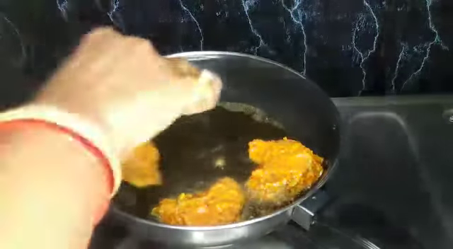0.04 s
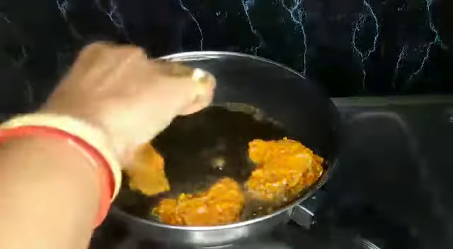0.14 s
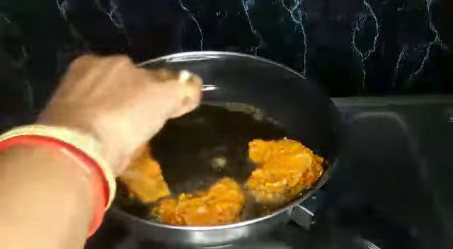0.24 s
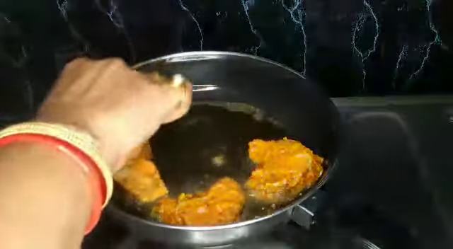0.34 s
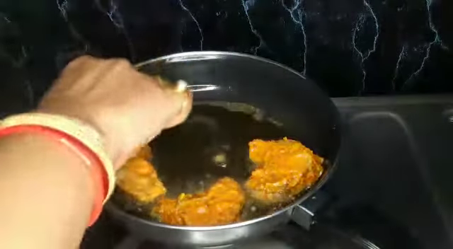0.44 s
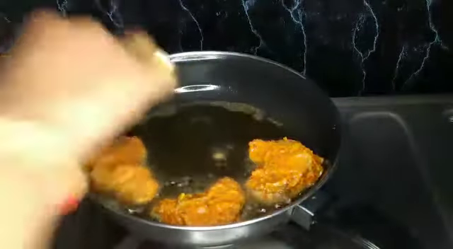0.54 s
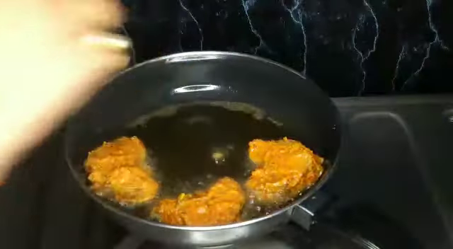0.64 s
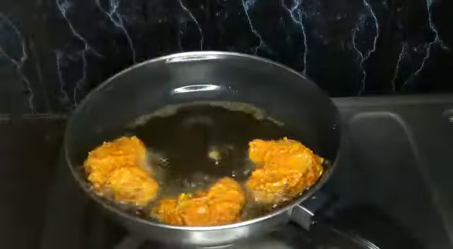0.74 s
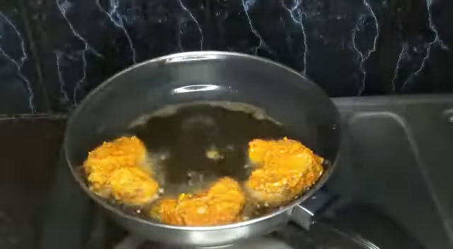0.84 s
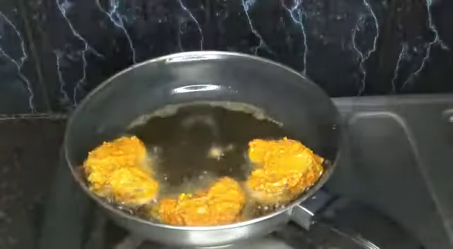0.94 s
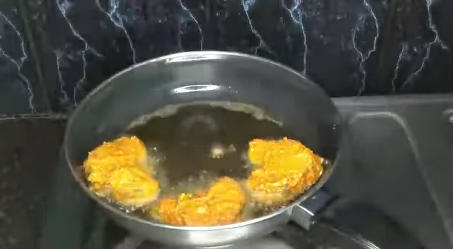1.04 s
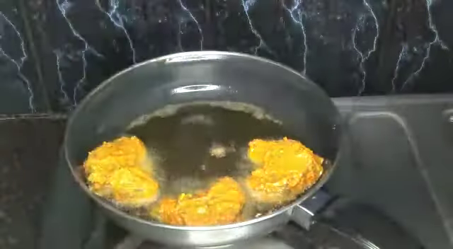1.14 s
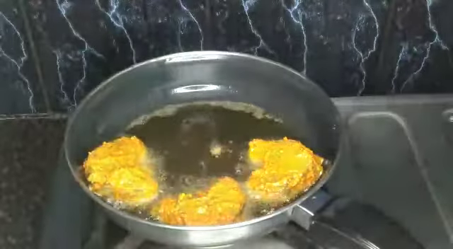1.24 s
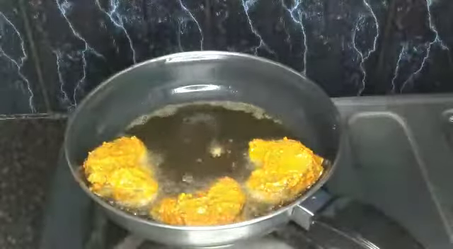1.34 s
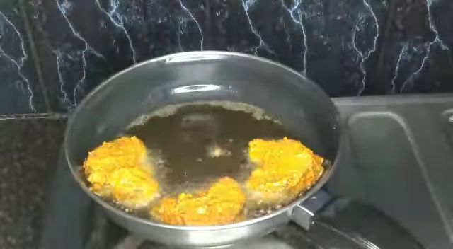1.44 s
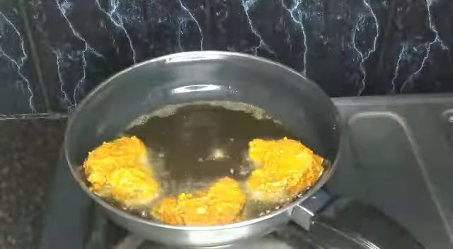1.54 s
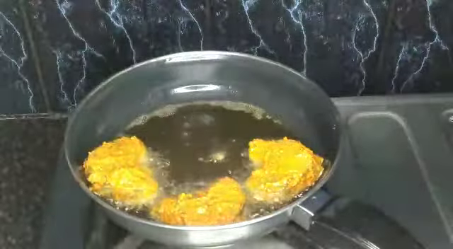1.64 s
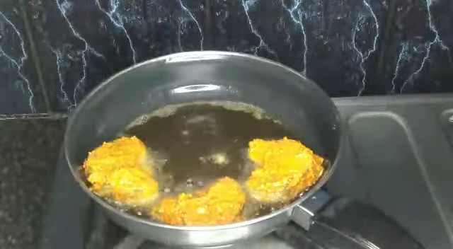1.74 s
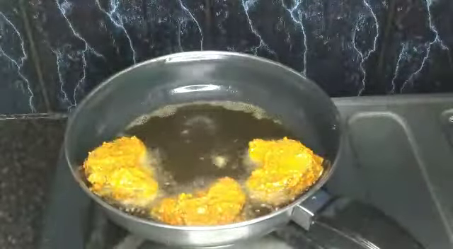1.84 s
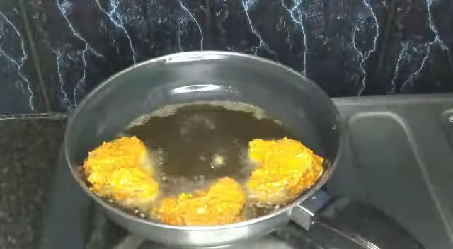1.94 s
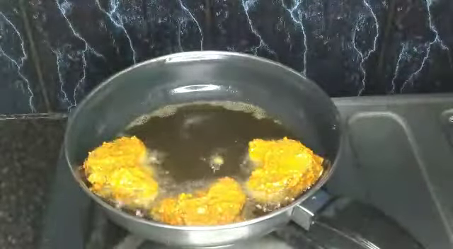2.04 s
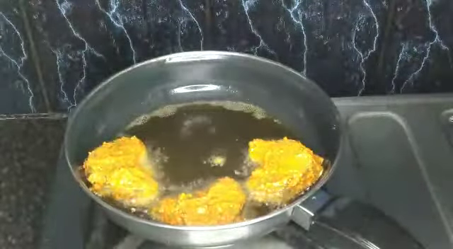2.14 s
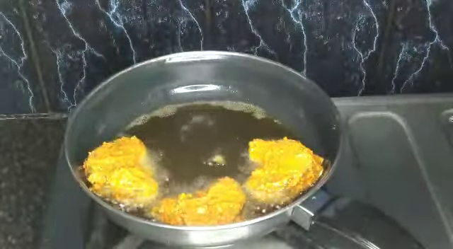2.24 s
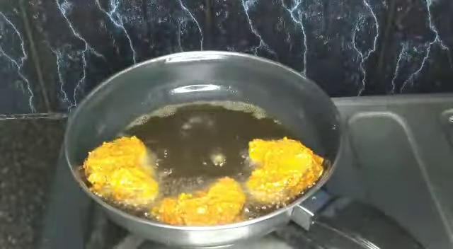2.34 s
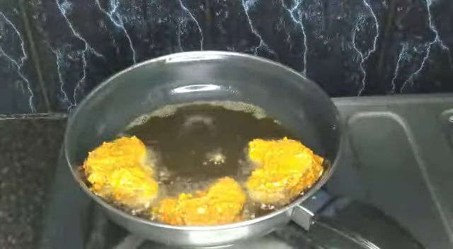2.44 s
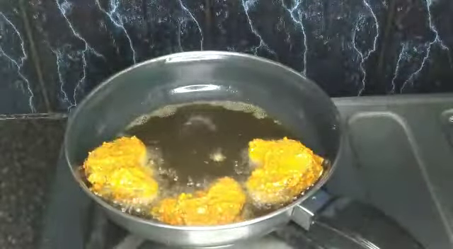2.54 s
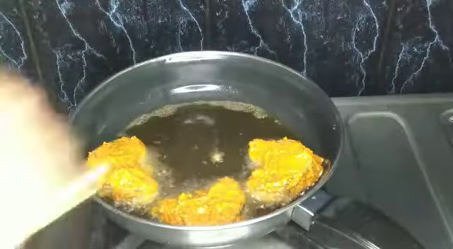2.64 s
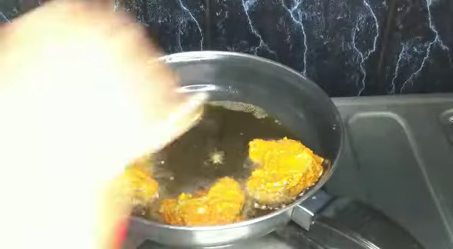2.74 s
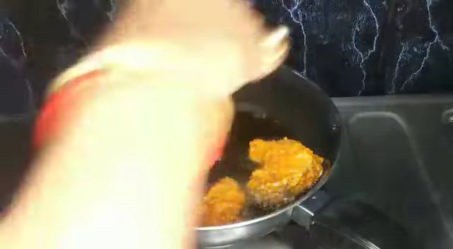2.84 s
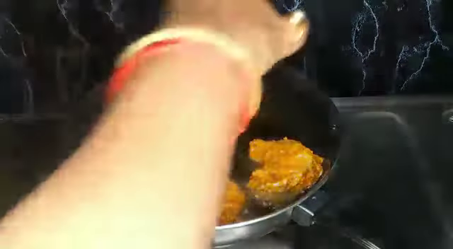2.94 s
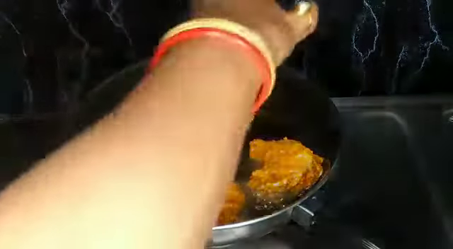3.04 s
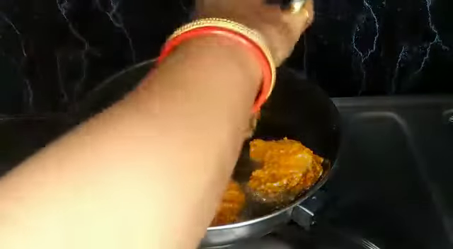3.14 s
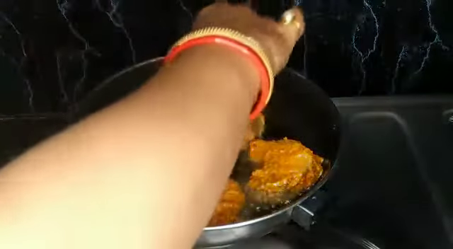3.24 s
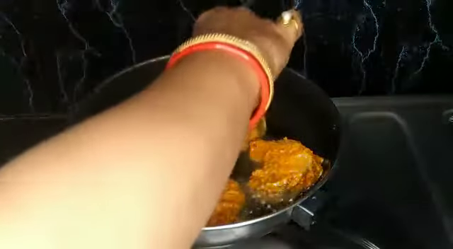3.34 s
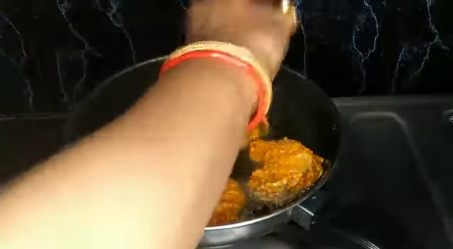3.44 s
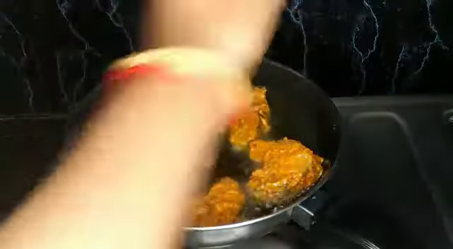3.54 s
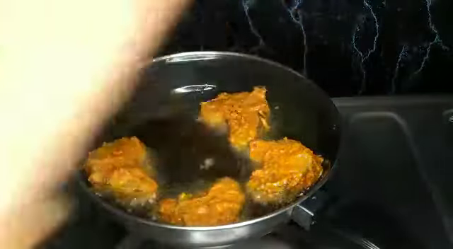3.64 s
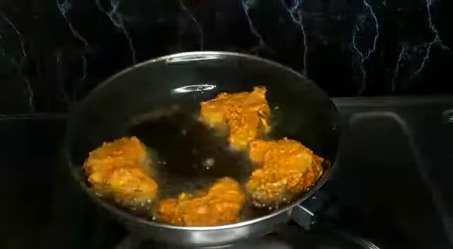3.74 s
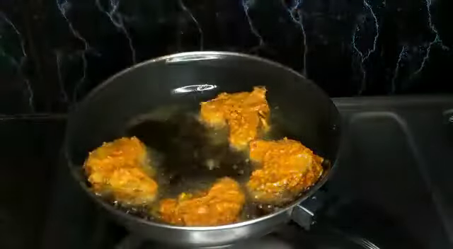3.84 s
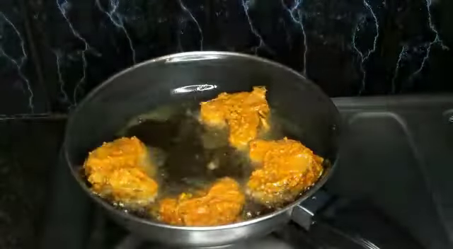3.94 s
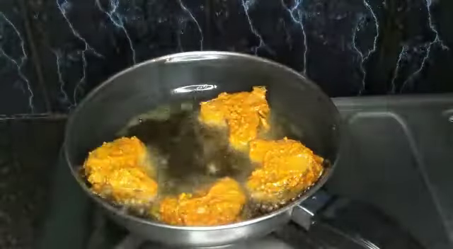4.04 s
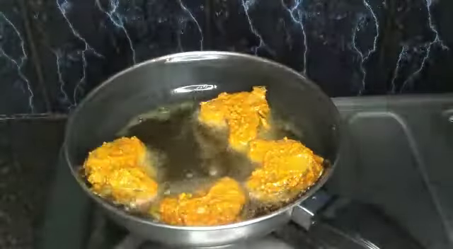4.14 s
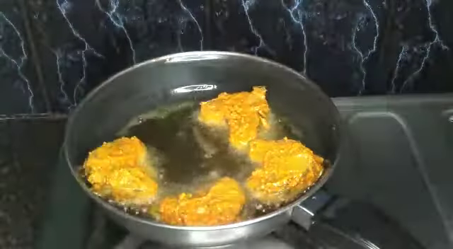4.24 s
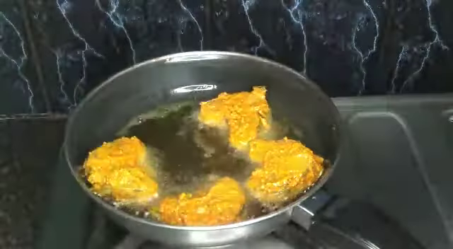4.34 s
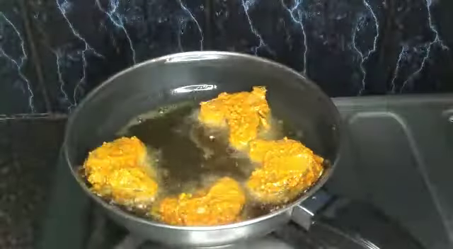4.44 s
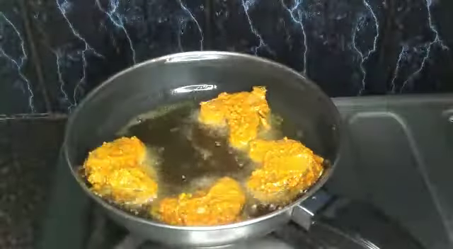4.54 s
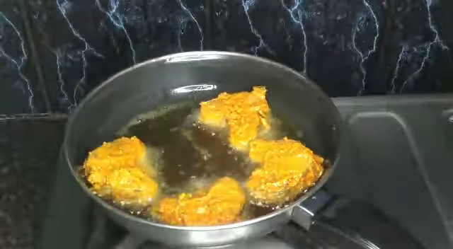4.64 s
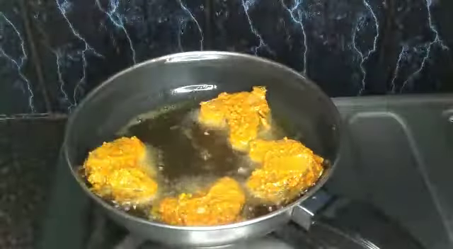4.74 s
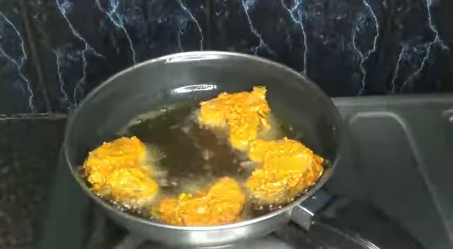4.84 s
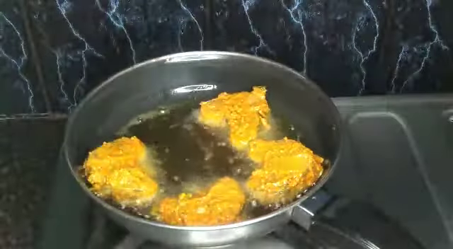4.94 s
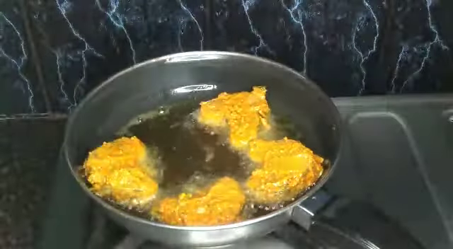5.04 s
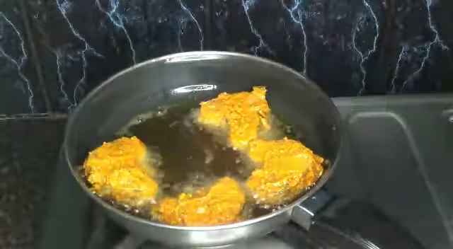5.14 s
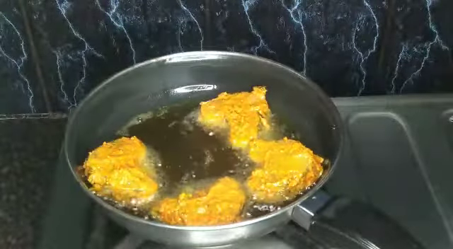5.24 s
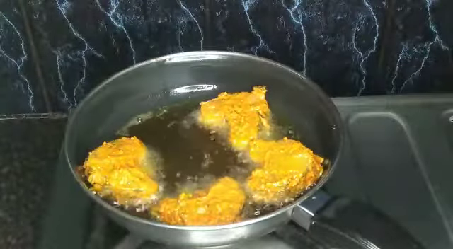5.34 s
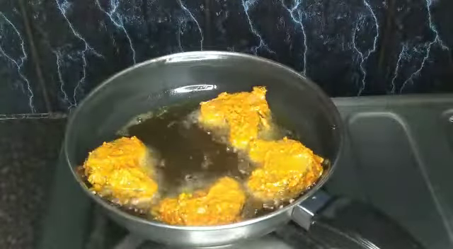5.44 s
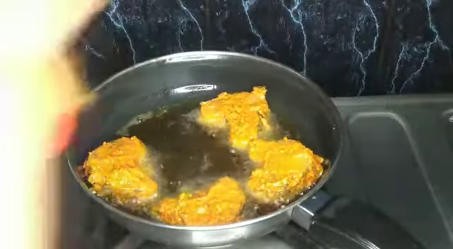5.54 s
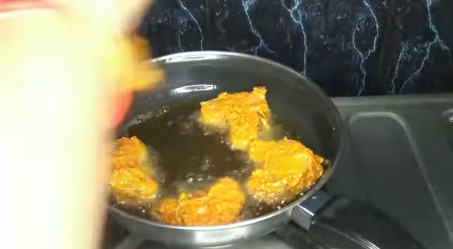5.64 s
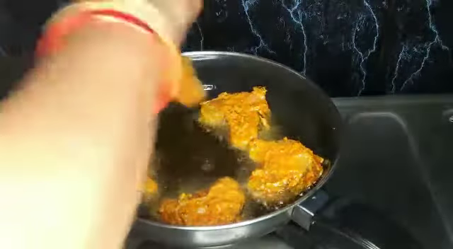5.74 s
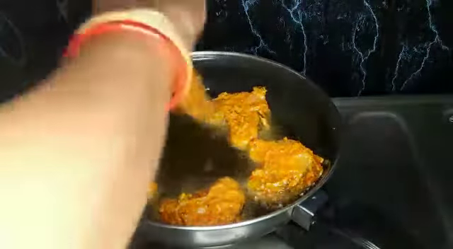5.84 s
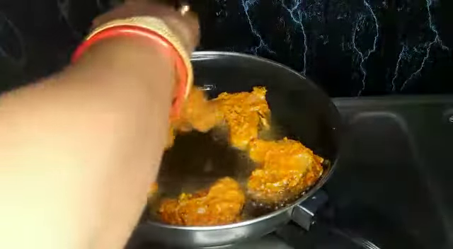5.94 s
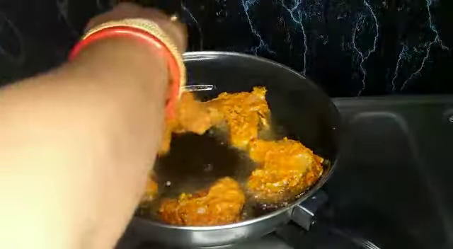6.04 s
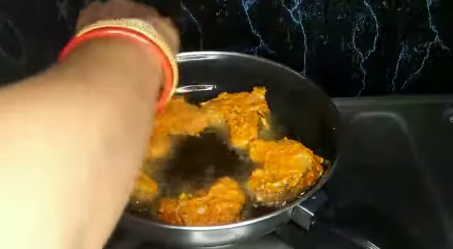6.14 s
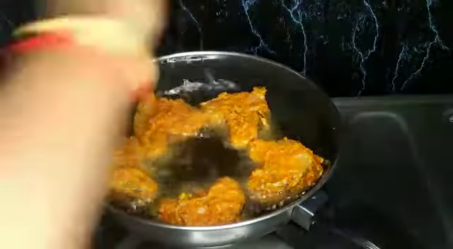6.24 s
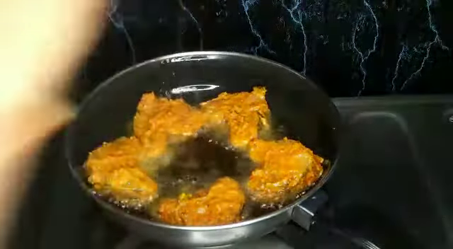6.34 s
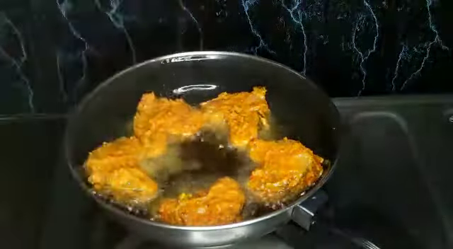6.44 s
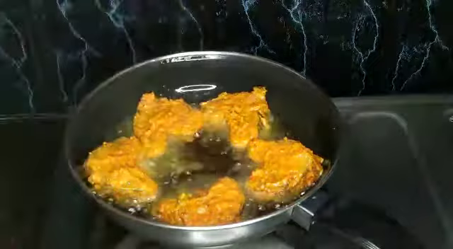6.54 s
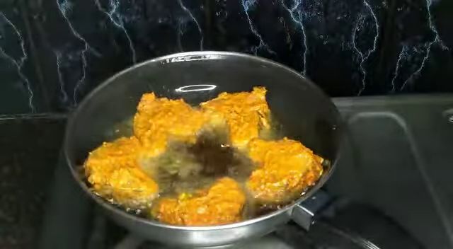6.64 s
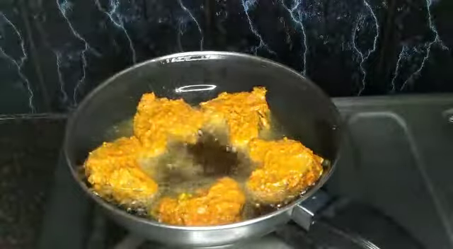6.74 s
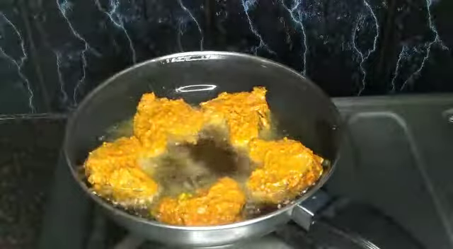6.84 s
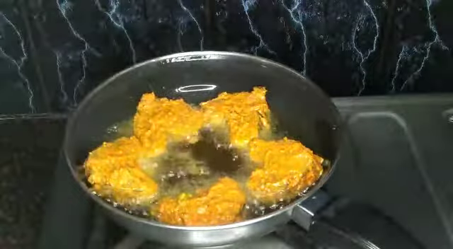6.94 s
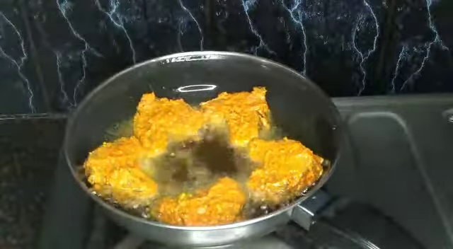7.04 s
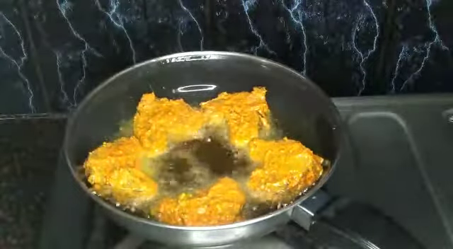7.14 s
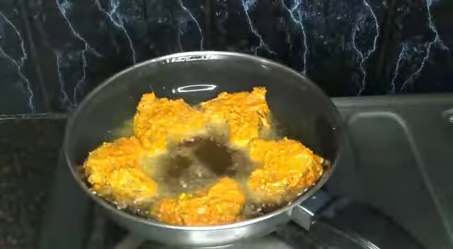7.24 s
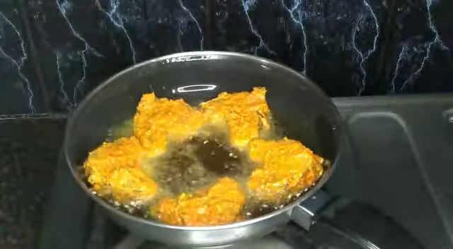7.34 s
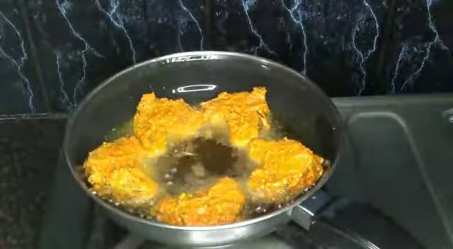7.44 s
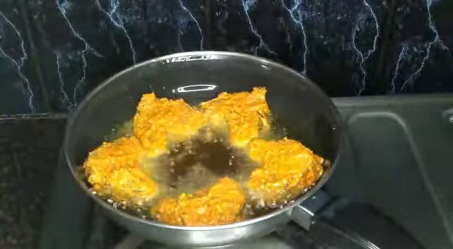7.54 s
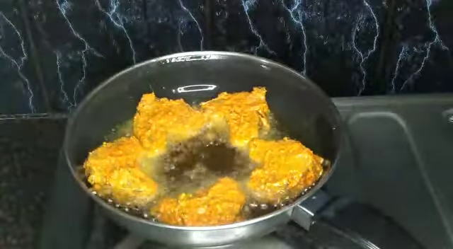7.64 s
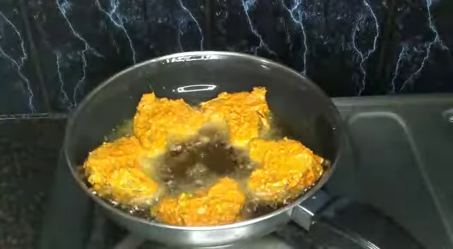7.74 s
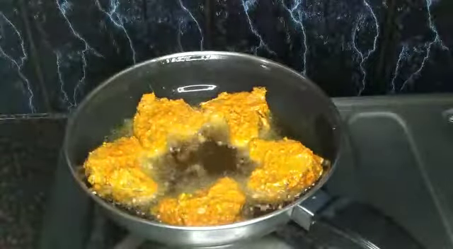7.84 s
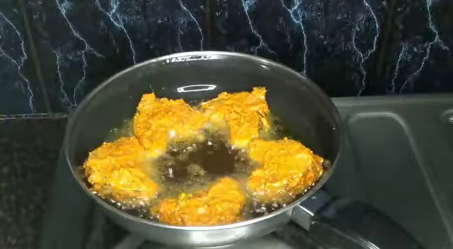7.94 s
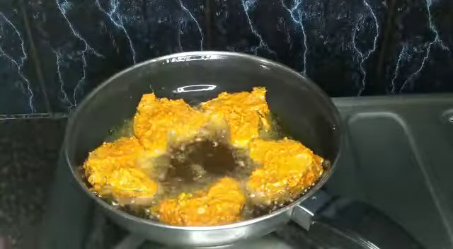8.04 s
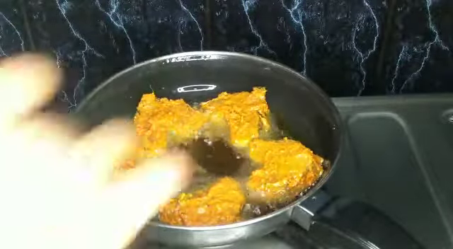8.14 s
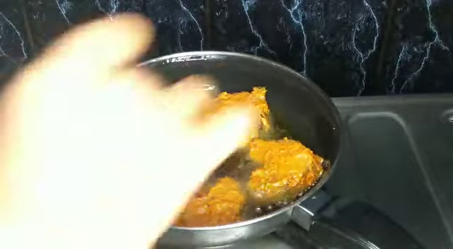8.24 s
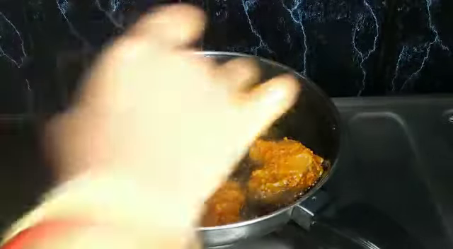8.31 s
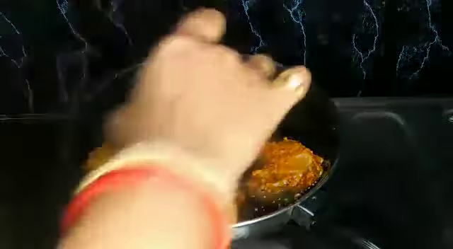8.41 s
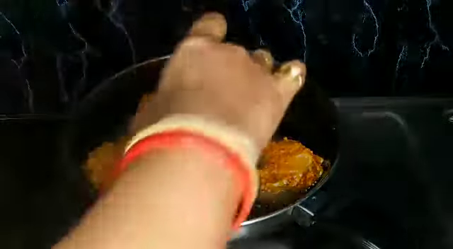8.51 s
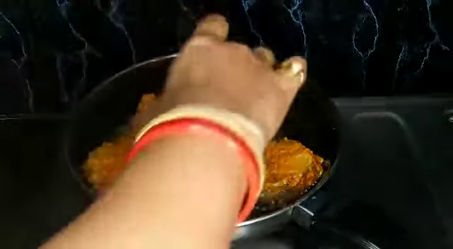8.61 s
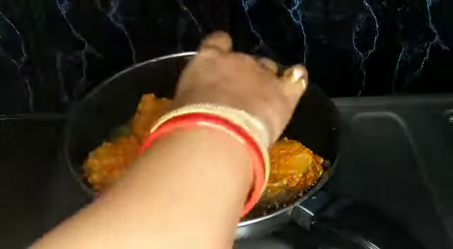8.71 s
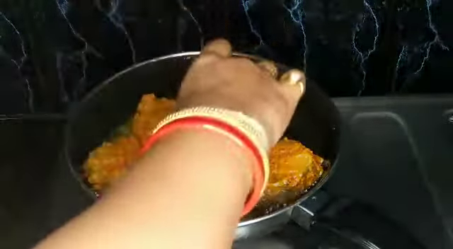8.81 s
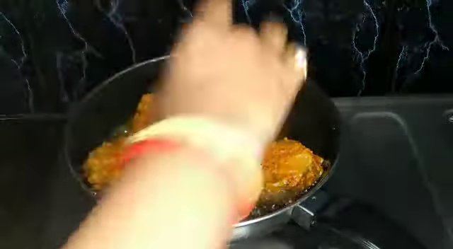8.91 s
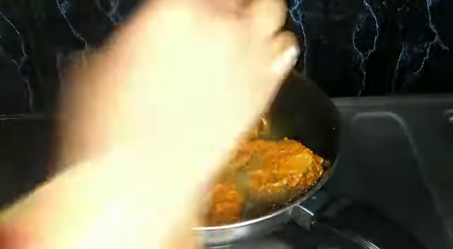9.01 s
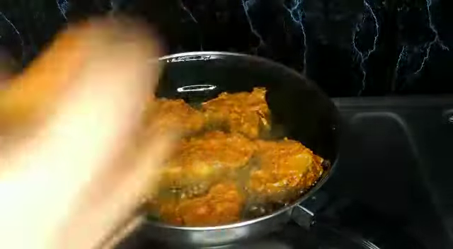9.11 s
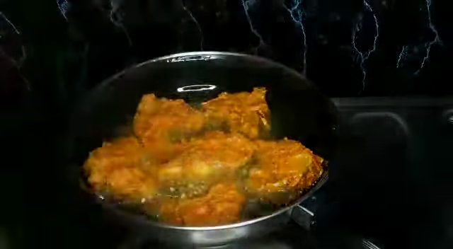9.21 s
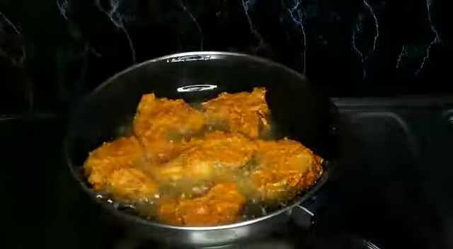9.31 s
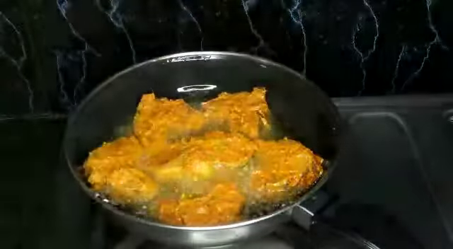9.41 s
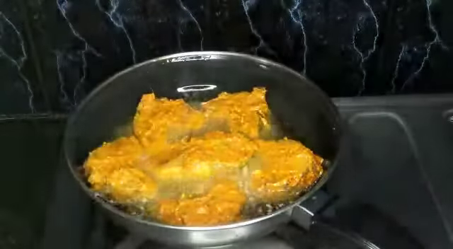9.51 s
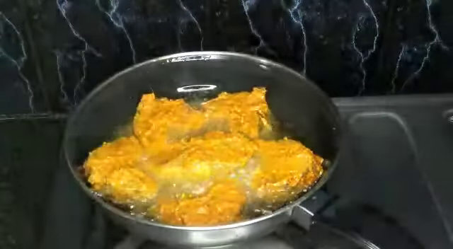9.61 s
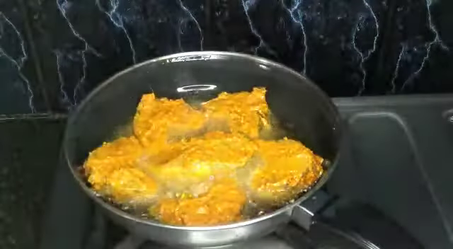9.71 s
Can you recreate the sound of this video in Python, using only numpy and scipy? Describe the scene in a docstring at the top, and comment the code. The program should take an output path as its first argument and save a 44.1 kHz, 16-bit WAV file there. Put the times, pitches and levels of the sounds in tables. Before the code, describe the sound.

Thin, high frying hiss with tiny sharp pops and occasional wet bubble bursts ringing slightly in the pan. It begins gently, stays sparse for three seconds, then surges hard twice as wet pieces meet the oil, each time settling back to light crackling. A softer, shorter surge with faint dull bumps comes near the end. Close phone microphone, bright sound, little bass, quiet kitchen background.

```python
"""Coated fish fries in a steel pan close to a phone: a brief swell of fizz opens over a quiet simmer.
The sizzle surges as wet pieces meet the oil, near 3.6 s and again near 6.3 s, and swells less near 9.3 s.
Throughout, noise and tiny damped rings make the fizz and simmer, brightest near 9 kHz; water drops spit
as short rings with spray, and large bubbles plop as longer rings with a gurgling tail and a splash.
Behind them lie filtered-noise room tone, a wavering two-tone hum and soft decaying bumps."""
import sys
import numpy as np
from scipy import signal
from scipy.fft import rfft, irfft, next_fast_len
from scipy.io import wavfile
from scipy.ndimage import uniform_filter1d, map_coordinates

SR = 44100
rng = np.random.default_rng(int(sys.argv[2]) if len(sys.argv) > 2 else 0)


def dump(signal):
    """Clip the signal to [-1, 1] and save it as 16-bit WAV at the path in sys.argv[1]."""
    limited = np.clip(np.atleast_2d(signal).T, -1, 1)
    pcm = np.round(limited * 32767).astype(np.int16)
    wavfile.write(sys.argv[1], SR, pcm)


N = 430857  # samples

# Level rides of the frying, before trims: start_s [s], fizz_db, seethe_db, simmer_db [dB]
FRYING_LEVELS = [(0, -49, -62.5, -56.5), (.17, -42.5, -48.5, -50.5), (.45, -38.5, -52.5, -52),
                 (.72, -40, -50.5, -53.5), (.98, -47.5, -57.5, -58), (1.2, -44, -57, -53),
                 (2.05, -47.5, -58, -57.5), (2.7, -43, -57.5, -60), (3.15, -50, -65, -62),
                 (3.4, -40.5, -59, -48.5), (3.6, -26, -38, -49.5), (3.75, -25, -39.5, -47),
                 (4.02, -25.5, -43.5, -49.5), (4.3, -31, -49.5, -53), (4.5, -34.5, -51, -57),
                 (4.6, -43.5, -54, -53.5), (4.87, -45.5, -62.5, -59.5), (5.9, -49, -57, -60),
                 (6.12, -39, -62.5, -59), (6.3, -26, -42, -49.5), (6.75, -29, -46.5, -46.5),
                 (7.0, -35.5, -57.5, -52.5), (7.2, -33.5, -64, -54), (7.5, -45.5, -69.5, -59),
                 (7.8, -52.5, -58, -55.5), (8.2, -45, -61.5, -56), (8.52, -52.5, -64, -61.5),
                 (8.65, -54.5, -57, -52), (8.85, -45, -54.5, -49.5), (9.28, -35, -43, -47),
                 (9.58, -37.5, -53.5, -50), (9.77, -41.5, -71, -55.5)]
# Level rides of the middle sizes, before trims: start_s [s], spatter_db, upper_simmer_db [dB]
MIDDLE_LEVELS = [(0, -79, -75), (.2, -65, -56), (.95, -63.5, -61), (2.0, -75, -61.5), (2.6, -67, -66),
                 (3.15, -68, -64.5), (3.45, -54.5, -52.5), (3.7, -41.5, -44), (4.05, -45, -49.5),
                 (4.55, -65, -57), (5.9, -72, -66.5), (6.3, -44, -48.5), (6.75, -54.5, -54.5),
                 (7.2, -61.5, -56.5), (7.8, -71, -64.5), (8.55, -69.5, -64), (9.3, -51, -56.5),
                 (9.77, -62, -58.5)]
# Colours of the bubble sizes, fine to coarse: freq_hz [Hz], gain_db [dB]
FIZZ_COLOUR = [(3240, -39), (5500, -15), (7570, -3), (8880, 3.5), (9940, 2), (11000, -5), (14300, -15.5),
               (14800, -36), (15000, -87)]
SPATTER_COLOUR = [(2600, -45), (3400, -5), (4600, -3.5), (5300, -1), (6000, 2), (7500, -32.5)]
SEETHE_COLOUR = [(1700, -71), (2300, -4.5), (2600, 1), (3300, -6), (4300, -17)]
UPPER_SIMMER_COLOUR = [(1100, -47), (1450, -3.5), (1800, 1), (2200, 0.5), (2800, -31)]
SIMMER_COLOUR = [(380, -52), (650, -7.5), (800, -0.5), (1300, 0), (1550, 1), (1900, -40)]


def frying():
    """Bubbles of several sizes, from fine fizz to a low simmer that rings in the pan's hollow."""
    fizz_db, seethe_db, simmer_db = curves(FRYING_LEVELS)
    spatter_db, upper_db = curves(MIDDLE_LEVELS)
    # the harder the frying, the more the bubbles even out
    uneven = np.interp(fizz_db, [-46, -33], [1, .35])
    # bubbles come in flurries that stir all sizes
    flurry_db = 2.0 * uneven * wobble(25)

    fizz_gain = amp(fizz_db - 1.0 + flurry_db + 1.3 * wobble(90))
    fizz = fizz_gain * bed(FIZZ_COLOUR, patchy_db=1.5, count=24000, spread_db=4.5, share=0.25, life_s=0.005)

    spatter_gain = amp(spatter_db + 3.5 + flurry_db + 2.5 * uneven * wobble(35))
    spatter = spatter_gain * bed(SPATTER_COLOUR, patchy_db=4.5, count=1100, spread_db=3.5,
                                 share=.25, life_s=0.016)

    seethe_gain = amp(seethe_db - 4.0 + 0.5 * flurry_db + 1.6 * uneven * wobble(30))
    seethe = seethe_gain * bed(SEETHE_COLOUR, patchy_db=2.5, count=2400, spread_db=2.5,
                               share=0.18, life_s=0.012)

    simmer = bed(SIMMER_COLOUR, patchy_db=1.5, count=900, spread_db=-4.5, share=0.25, life_s=0.051)
    upper = bed(UPPER_SIMMER_COLOUR, patchy_db=2.5, count=900, spread_db=4.5, share=0.23, life_s=0.014)
    low = amp(simmer_db - 6.0) * unit(hollow(simmer)) + amp(upper_db - 1.5) * unit(hollow(upper))
    low_swing = amp(0.093 * flurry_db + 0.79 * uneven * wobble(15))
    return fizz + spatter + seethe + low_swing * low


# Water drops spitting: start_s [s], level_db [dB, before trim], pitch_hz [Hz],
# sputter_db [dB of spray against level_db]
SPIT_EVENTS = [(0.2423, -30, 9210, -15), (0.2678, -38, 8990, -15), (0.3247, -22.5, 9900, -15),
               (0.3704, -29, 9360, -21), (0.4284, -33, 9200, -22), (0.5043, -29.5, 8150, -4),
               (0.615, -28.5, 10100, -9.5), (0.8124, -24, 8160, -16), (0.8194, -25, 8100, -18),
               (0.8304, -30, 9160, -18), (1.0256, -43, 8750, -6), (1.049, -27.5, 8750, -7.5),
               (1.0807, -21.5, 9070, -9), (1.0934, -29, 9100, -18), (1.1626, -20, 9200, -14.5),
               (1.213, -27.5, 9100, -8), (1.3455, -27.5, 9850, -20), (1.5415, -21, 9700, -12),
               (1.6445, -27, 8940, -23), (1.6722, -22.5, 9440, -11.5), (1.8098, -18.5, 7850, -22),
               (1.8595, -22.5, 9100, -14.5), (2.0322, -25, 9750, -12), (2.243, -21, 8900, -23),
               (2.261, -29, 9540, -20), (2.2902, -28, 8500, -15), (2.3241, -28, 7700, -13),
               (2.419, -27.5, 9200, -6), (2.511, -20.5, 8540, -18), (2.6257, -22, 9130, -13),
               (2.809, -26, 8800, -18), (2.863, -24.5, 9060, -11.5), (2.957, -24, 10000, -18),
               (2.978, -31.5, 9650, -5), (3.2615, -33, 10300, -18), (3.2824, -35, 9100, -6),
               (3.32, -25.5, 8880, -8.5), (3.48, -25, 9870, -15), (3.5584, -22, 9750, -8),
               (3.677, -14, 9100, -9), (3.9374, -18, 9720, -15), (4.0098, -10.5, 8200, -25),
               (4.0477, -15, 9150, -17), (4.3938, -10, 9100, -17.5), (4.4064, -25, 9430, -24),
               (4.435, -16, 7950, -16), (4.6733, -27.5, 9250, -10.5), (4.7133, -30, 9050, -7),
               (4.8289, -37, 9200, -31), (4.8552, -21, 10100, -10.5), (5.0404, -28, 10900, -13),
               (5.1078, -19.5, 9000, -15.5), (5.2126, -33, 11300, -24), (5.242, -24.5, 10660, -22),
               (5.3534, -22, 9650, -14.5), (5.438, -23, 8900, -12), (5.5348, -29, 8800, -8),
               (5.654, -27.5, 8800, -23), (5.7348, -28, 9500, -17), (5.8345, -31, 9700, -9),
               (5.9853, -23, 10300, -28), (6.013, -31, 9400, -21), (6.0543, -34, 9140, -15),
               (6.1959, -12.5, 9770, -20), (6.2338, -16, 9140, -12), (6.884, -19, 9300, -16),
               (6.9296, -23, 9070, -19), (6.952, -23, 9000, -13), (7.0386, -15.5, 8520, -16),
               (7.0808, -11, 8500, -17), (7.0858, -14, 8100, -31), (7.1107, -26, 8900, -13),
               (7.1594, -17, 8800, -17), (7.1771, -16, 8300, -24), (7.206, -19, 8900, -15),
               (7.3746, -18.5, 8800, -27), (7.3936, -21.5, 9400, -29), (7.436, -25, 9040, -11.5),
               (7.5602, -31.5, 9280, -8.5), (7.59, -18, 9350, -29), (7.5984, -24, 9310, -20),
               (7.623, -23, 9650, -24), (7.641, -15.5, 9350, -21), (7.6777, -23, 9400, -10.5),
               (7.9497, -32, 9700, -13), (8.0945, -31, 8400, -13), (8.1518, -26.5, 9700, -24),
               (8.231, -32, 7860, -16), (8.5757, -30, 9950, -10), (8.5959, -28.5, 7860, -19),
               (8.6114, -33, 9700, -12), (8.7346, -26.5, 9050, -16.5), (9.0798, -28, 9700, -18),
               (9.2744, -21, 9940, -18), (9.353, -21.5, 9600, -15), (9.7115, -22, 8900, -17.5)]
SMALL_SPITS = 240  # small drops at random moments
SPIT_HZ, SPIT_SCATTER_HZ = 9420, 1800  # ring of a small drop and its scatter either way
# over the fizz of the moment; size scatter; spray against the drop; ceiling before trim
SMALL_DB, SMALL_SCATTER_DB, SMALL_SPUTTER_DB, SMALL_TOP_DB = 4, 2.5, -19, -23


def small_spits():
    """Small drops land at random, their level riding on the fizz; most are soft, a few are loud."""
    fizz_db = curves(FRYING_LEVELS)[0]
    drops = []
    for moment, size, pitch in rng.random((SMALL_SPITS, 3)):
        level_db = fizz_db[int(moment * N)] + SMALL_DB - SMALL_SCATTER_DB * np.log(1 - size)
        pitch_hz = SPIT_HZ + SPIT_SCATTER_HZ * (2 * pitch - 1)
        drops.append((moment * N / SR, min(level_db, SMALL_TOP_DB), pitch_hz, SMALL_SPUTTER_DB))
    return drops


def spits():
    """A drop flashes to steam: a ring swells and dies 60 dB in 4 ms, then a sputter of spray crackles."""
    ring, spray, t = np.zeros(N + SR), np.zeros(N + SR), np.arange(SR // 5) / SR
    snap = amp(-60 * t / .004) * (1 - np.exp(-t / .0003))
    for start_s, level_db, pitch_hz, sputter_db in [*SPIT_EVENTS, *small_spits()]:
        add(ring, start_s, amp(level_db + 10) * snap * np.sin(2 * np.pi * pitch_hz * t))
        long_spray = amp(level_db + sputter_db - 60 * t / 0.16)
        short_spray = amp(level_db - 29 - 60 * t / 0.0023)
        add(spray, start_s, long_spray + short_spray)
    # the spray comes in lumps
    crackle = bed(FIZZ_COLOUR, patchy_db=4.5, count=9000, spread_db=2.5, share=0.35, life_s=0.003)
    sputter = spray[:N] * crackle
    # small drops have no bass
    return filtered(ring[:N] + sputter, lambda hz: 1 / (1 + (5500 / (hz + 1)) ** 6))


# Large bubbles bursting: start_s [s], level_db [dB, before trim], pitch_hz [Hz],
# splash_db [dB of splash against level_db, before trim]
PLOP_EVENTS = [(0.08, -35.5, 5850, -32), (0.172, -28, 6100, -28), (0.379, -34.5, 5600, -27),
               (0.508, -36.5, 5000, -6), (0.73, -33.5, 5000, -10), (0.817, -33, 3330, -9.5),
               (0.895, -31, 6320, -37), (1.0798, -38.5, 888, 2), (0.159, -33, 5710, -30),
               (0.2688, -36, 5510, -22), (2.863, -37, 4460, -18), (2.9278, -37, 5100, -33),
               (3.02, -36.5, 2740, -8), (3.2076, -40, 5420, -30), (2.996, -41, 2470, -12),
               (1.317, -36, 5700, -34), (1.446, -25.5, 5710, -24), (1.482, -31, 5940, -7.5),
               (1.579, -38, 2550, -6), (1.781, -36, 2950, -7), (1.85, -29.5, 2530, -10.5),
               (1.928, -39.5, 2420, -0.5), (2.179, -29.5, 2270, -14), (2.262, -26.5, 1810, -15),
               (2.298, -36, 2620, -9), (2.422, -30, 6200, -23.5), (2.632, -33, 5480, -14),
               (2.814, -34, 5860, -33), (2.826, -38, 4320, -14), (3.023, -33, 4030, -16.5),
               (3.304, -33.5, 3590, -13), (3.321, -28.5, 2710, -28), (3.6, -25, 2500, -16),
               (3.676, -25.5, 2680, -16.5), (3.881, -29.5, 2540, -18), (4.026, -35, 1800, -3.5),
               (4.789, -35, 6000, -30), (5.04, -36, 5450, -14), (5.521, -31.5, 5760, -19),
               (5.67, -40, 1795, -6.5), (5.6855, -34, 5820, -30), (5.8714, -36, 6000, -30),
               (5.738, -30.5, 5010, -18), (5.834, -33, 2570, -17.5), (5.987, -26, 5640, -49),
               (6.021, -28.5, 5810, -37), (6.204, -25.5, 4650, -13), (6.773, -32, 6100, -30),
               (6.8254, -24, 5760, -28), (6.975, -34, 3800, -25), (7.673, -42.5, 3900, -15),
               (7.2047, -30.5, 1507, -5), (7.331, -38, 4370, -23), (7.36, -37, 3870, -36),
               (7.417, -36, 5400, -8), (8.091, -35, 5070, -11), (8.38, -33.5, 5830, -16),
               (8.442, -42, 3230, -15), (8.599, -32, 5350, -9), (8.963, -30.5, 3230, -25),
               (9.197, -30, 3200, -23), (9.315, -29, 3480, -24), (9.488, -28.5, 3960, -27)]
# Larger, lower bubbles gurgle longer: pitch_hz [Hz], decay_s [s to fall 60 dB]
GURGLE_DECAY = [(2000, 0.25), (3000, .12), (6000, 0.08)]


def plops():
    """A large bubble's cavity rings, gurgles on in a rough tail, and its splash sounds broadly in the pan."""
    out, splash, t = np.zeros(N + SR), np.zeros(N + SR), np.arange(SR // 5) / SR
    for start_s, level_db, pitch_hz, splash_db in PLOP_EVENTS:
        phase = 2 * np.pi * pitch_hz * t
        noise = rng.standard_normal((4, len(t)))
        # smoothing over three cycles makes the tail waver
        span = round(SR * 3 / pitch_hz)
        rough = unit(uniform_filter1d(uniform_filter1d(noise[:2], size=span), size=span))
        lumps_db = 3.05 * unit(uniform_filter1d(noise[3], size=4 * span))
        fade = amp(-60 * t / max(along(GURGLE_DECAY, pitch_hz), .005) + lumps_db)
        tail = amp(-9.0) * fade * (rough[0] * np.sin(phase) + rough[1] * np.cos(phase))
        # the ring falls 60 dB in 36 cycles
        ring = amp(3 - 60 * t * pitch_hz / 36) * np.sin(phase)
        onset = 1 - np.exp(-t / 0.0004)
        add(out, start_s, amp(level_db - 3.0) * onset * (ring + tail))
        splash_fade = 0.39 * fade + 1.4 * amp(-60 * t / 0.00099)
        add(splash, start_s, amp(level_db + splash_db + 8.5) * splash_fade * noise[2])
    band = lambda hz: 1 / (1 + (650 / (hz + 1)) ** 6)
    soft_splash = filtered(splash[:N], lambda hz: band(hz) / (1 + (hz / 4500) ** 2))
    return filtered(out[:N], band) + hollow(soft_splash)


# The pan's resonances: centre_hz [Hz], width_hz [Hz], gain_db [dB]
PAN_RESONANCES = [(860, 52, 8), (1008, 63, 4.5), (1243, 4.3, 2.5), (1482, 19, -20), (1830, 15, 4)]


def hollow(x):
    """The pan's bowl adds a few resonant bands to the direct sound."""
    def bowl(hz):
        response = 1
        for centre, width, gain_db in PAN_RESONANCES:
            damping = 1j * hz * width
            response = response + amp(gain_db) * damping / (centre * centre - hz * hz + damping)
        return response
    return filtered(x, bowl)


# Echoes of pan and wall: delay_s [s], level_db [dB]
PAN_ECHOES = [(.0014, -13), (.0026, -18), (.0042, -14), (.007, -19), (.011, -21)]


def echoes(x):
    """Short copies return from the pan's sides and the wall behind."""
    copies = [amp(level_db) * np.pad(x, ((0, 0), (round(delay_s * SR), 0)))[:, :N]
              for delay_s, level_db in PAN_ECHOES]
    return x + sum(copies)


# The hum's two tones: pitch_hz [Hz], level_db [dB, relative]
HUM_TONES = [(100, -6.5), (293, 0.5)]


def appliance_hum(hum_db):
    """Two tones wander in pitch separately and waver in level together."""
    waver_db = 2.2 * wobble(14)
    hum = np.zeros(N)
    for pitch_hz, level_db in HUM_TONES:
        phase = 2 * np.pi * np.cumsum(pitch_hz + 2.5 * wobble(18)) / SR
        hum += amp(level_db + hum_db + 2.5 + waver_db) * np.sin(phase)
    return hum


# Soft low bumps on the worktop: start_s [s], level_db [dB, before trim], pitch_hz [Hz]
BUMP_EVENTS = [(0.367, -46, 206), (3.66, -53, 150), (6.15, -52, 90), (9.078, -49, 171), (9.277, -43, 155),
               (9.311, -46, 119), (9.381, -52, 220), (9.429, -53, 83.4)]


def worktop_bumps():
    """Each knock sounds with the worktop's own 65 Hz boom, both dying 60 dB in 54 ms."""
    bumps, t = np.zeros(N + SR), np.arange(SR // 4) / SR
    for start_s, level_db, pitch_hz in BUMP_EVENTS:
        push = np.sin(2 * np.pi * pitch_hz * t) + 0.73 * np.sin(2 * np.pi * 65 * t)
        add(bumps, start_s, amp(level_db - 1.0 - 60 * t / 0.054) * (1 - np.exp(-t / 0.006)) * push)
    return bumps[:N]


# Level rides of the room, before trims: start_s [s], rumble_db, room_tone_db, hum_db [dB]
ROOM_LEVELS = [(0, -72, -72, -73), (.7, -72.5, -73, -78), (2.0, -77, -75, -83.5), (2.6, -75, -76.5, -84),
               (3.7, -82.5, -71.5, -82), (5.0, -76.5, -78, -82), (6.2, -78.5, -77.5, -82),
               (8.2, -77, -77, -80.5), (9.2, -73, -76, -80), (9.77, -83, -78, -89)]
# Colours of room tone and rumble: freq_hz [Hz], gain_db [dB]
ROOM_COLOUR = [(200, -20.5), (264, -2), (369, -3.5), (436, 5.5), (700, 0.5), (910, -47), (1500, -120)]
RUMBLE_COLOUR = [(15, -26), (35, 2.5), (60, -1.5), (97, -8.5), (220, -4.5), (300, -30), (500, -120)]


def kitchen():
    """Coloured noise makes rumble and room tone, beside an appliance hum and soft bumps."""
    rumble_db, room_db, hum_db = curves(ROOM_LEVELS)
    room_gain = amp(room_db + 2.0 + 1.5 * wobble(3.6))
    room = room_gain * bed(ROOM_COLOUR, patchy_db=3.0, count=300, spread_db=1, share=0.1, life_s=0.03)
    rumble_gain = amp(rumble_db - 5.0 + 1.3 * wobble(9.6))
    rumble = rumble_gain * bed(RUMBLE_COLOUR, patchy_db=1.0, count=100, spread_db=-4.0,
                               share=0.05, life_s=0.022)
    return rumble + room + appliance_hum(hum_db) + worktop_bumps()


# Stereo width of every noise bed: freq_hz [Hz], side_db [dB, side against mid]
STEREO_WIDTH = [(40, -24), (250, -32), (1200, -44.5), (3300, -55.5), (4600, -9), (6000, -10), (8000, -5),
                (14000, -4.5)]


def bed(spectrum, patchy_db, count, spread_db, share, life_s):
    """Stereo hiss plus central bubbles in one colour, mid rms near 1; share is the bubbles' power."""
    share = np.clip(share, 0, 1)
    colour = lambda hz: amp(along(spectrum, hz))
    mid_and_side = lambda hz: colour(hz) * [hz ** 0, amp(along(STEREO_WIDTH, hz))]
    hiss, side = filtered(patchy(patchy_db), mid_and_side)
    grains = unit(filtered(bursts(count, spread_db, spectrum, life_s), colour))
    mid = np.sqrt(1 - share) * hiss / np.std(hiss) + np.sqrt(share) * grains
    side = side / np.std(hiss)
    return np.array([mid + side, mid - side])


def bursts(count, spread_db, spectrum, life_s):
    """Bursting bubbles: damped rings of random pitch; a few stand out louder, or softer if spread < 0."""
    at, size, pitch = rng.random((count, 3)).T
    low_hz, high_hz = spectrum[0][0], spectrum[-1][0]
    # each ring is cut at two thirds of its clipped life
    k = np.arange(round(np.clip(life_s, .001, .025) * SR * 2 / 3))
    level_db = -spread_db * np.log(1 - .985 * size)
    pitch_hz = low_hz + (high_hz - low_hz) * pitch
    decay = amp(level_db[:, None] - 60 * k / SR / life_s)
    rings = decay * np.sin(2 * np.pi * pitch_hz[:, None] * k / SR)
    places = (at * N).astype(int)[:, None] + k
    return unit(np.bincount(places.ravel(), rings.ravel())[:N])


def patchy(depth_db):
    """Two unrelated noises share patches of random gain in time and frequency."""
    z = signal.stft(rng.standard_normal((2, N)), nperseg=256)[2]
    field = uniform_filter1d(rng.standard_normal(z.shape[1:]), size=5, axis=0)
    field = uniform_filter1d(field, size=9, axis=1)
    return unit(signal.istft(z * amp(depth_db * unit(field)), nperseg=256)[1][:, :N])


def wobble(rate):
    """A smooth random curve with rate knots a second."""
    coarse = np.arange(0, N + 32, 32)
    smooth = map_coordinates(rng.standard_normal(int(N * rate / SR) + 4), [coarse * rate / SR])
    return np.interp(np.arange(N), coarse, smooth)


def curves(rows):
    """One value per sample for each column after the time."""
    start_s, *columns = np.transpose(rows)
    return [np.interp(np.arange(N) / SR, start_s, column) for column in columns]


def along(points, hz):
    """Read a value between (Hz, value) points on a log frequency axis."""
    f, v = np.transpose(points)
    return np.interp(np.log(hz + 1), np.log(f + 1), v)


def filtered(x, response):
    """Shape the spectrum by a response of frequency."""
    m = next_fast_len(N + 8192)
    return irfft(rfft(x, m) * response(np.fft.rfftfreq(m, 1 / SR)), m)[..., :N]


def amp(db):
    """Decibels to an amplitude factor."""
    return 10 ** (np.asarray(db) / 20)


def unit(x):
    """Scale to an overall rms of 1."""
    return x / np.sqrt(np.mean(x ** 2) + 1e-20)


def add(track, start_s, sound):
    """Mix a sound into the track at start_s seconds."""
    track[round(start_s * SR):][:len(sound)] += sound


def scene():
    """Frying in front, spits and plops echoing in the pan, the kitchen behind."""
    return frying() + echoes(spits() + plops()) + kitchen()


def record(dry):
    """The phone keeps nothing above its band limit of 14350 Hz."""
    return filtered(dry, lambda hz: hz < 14350)


dry = scene()
out = record(dry)
dump(out)
```